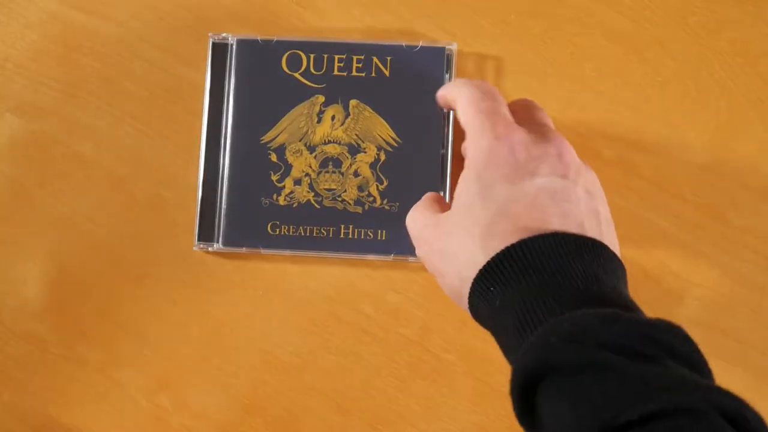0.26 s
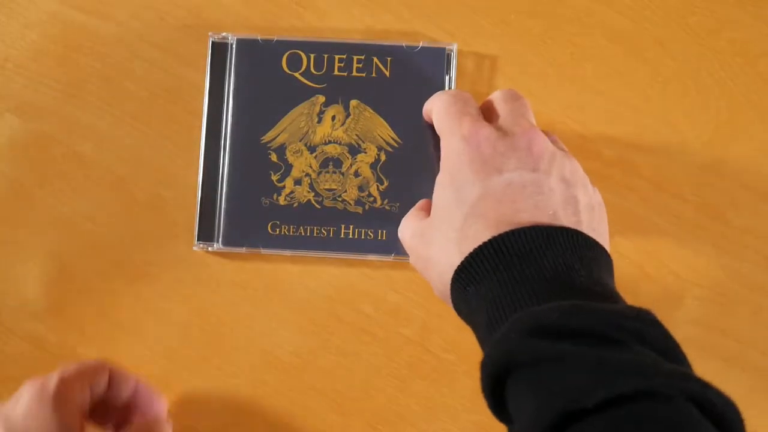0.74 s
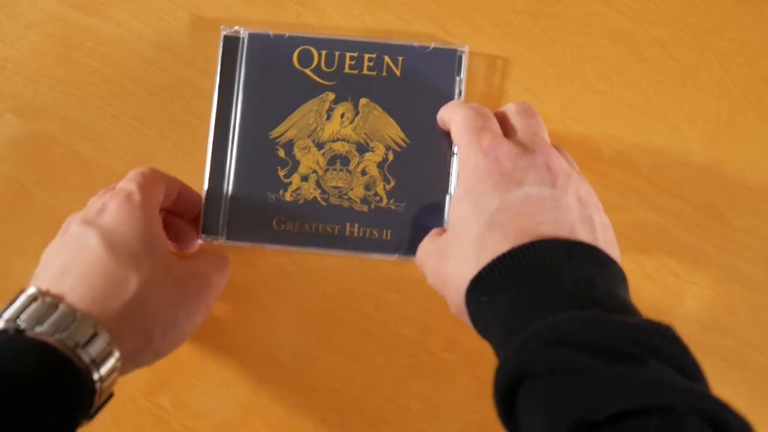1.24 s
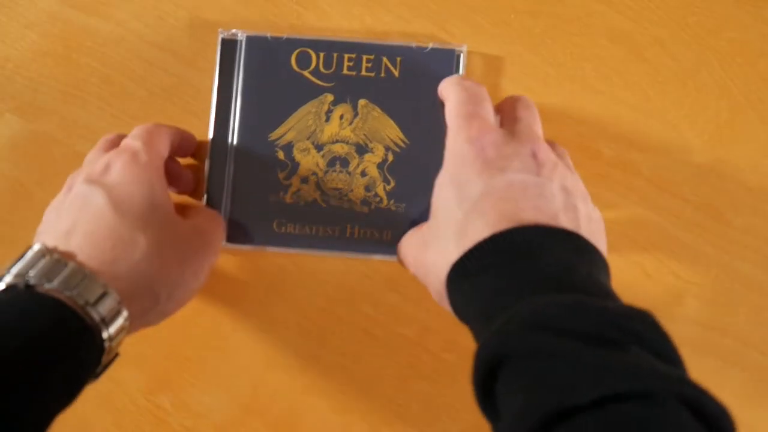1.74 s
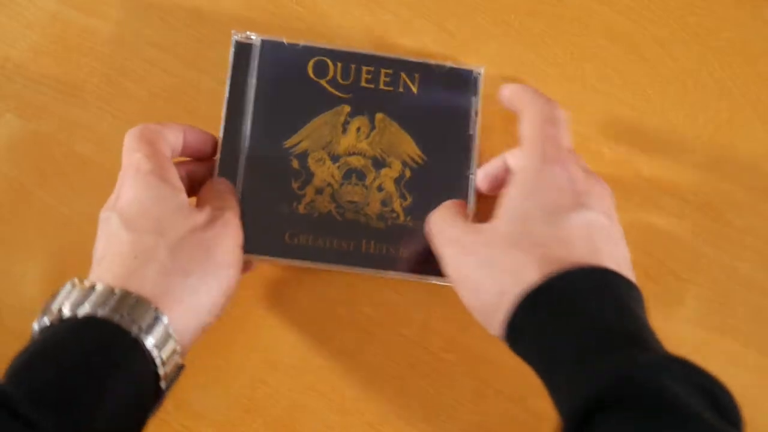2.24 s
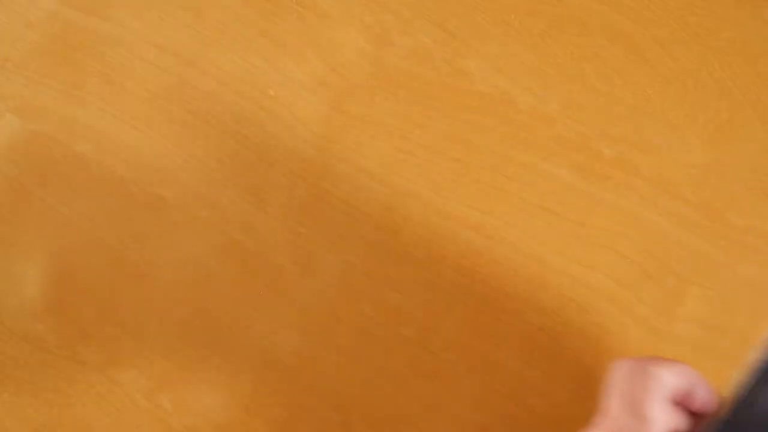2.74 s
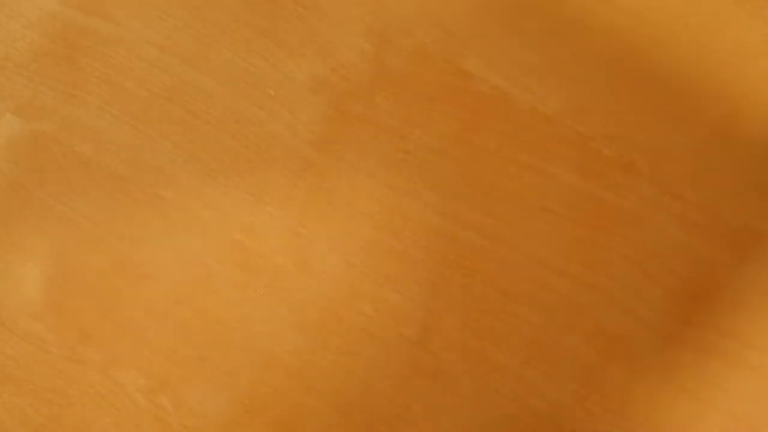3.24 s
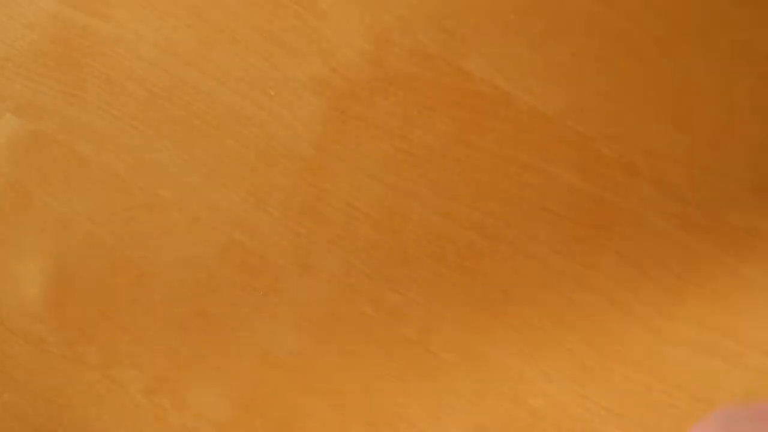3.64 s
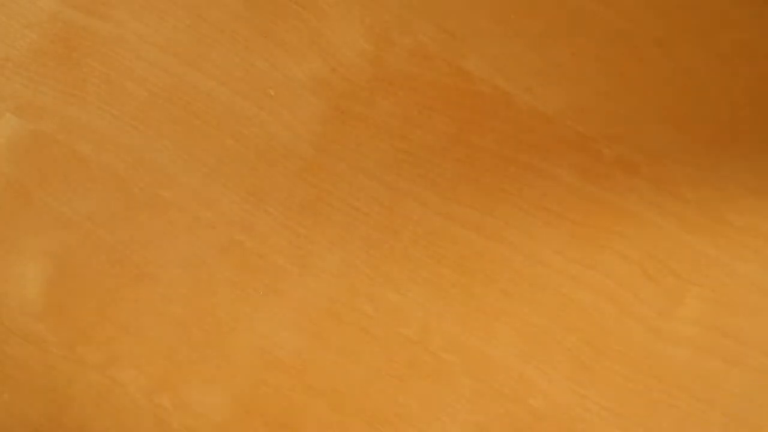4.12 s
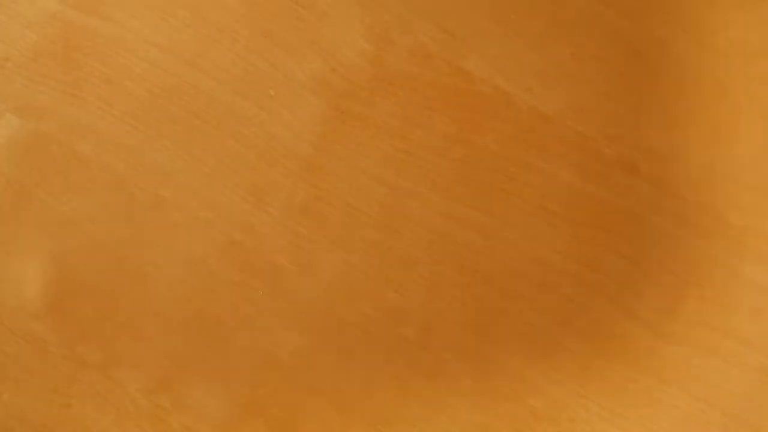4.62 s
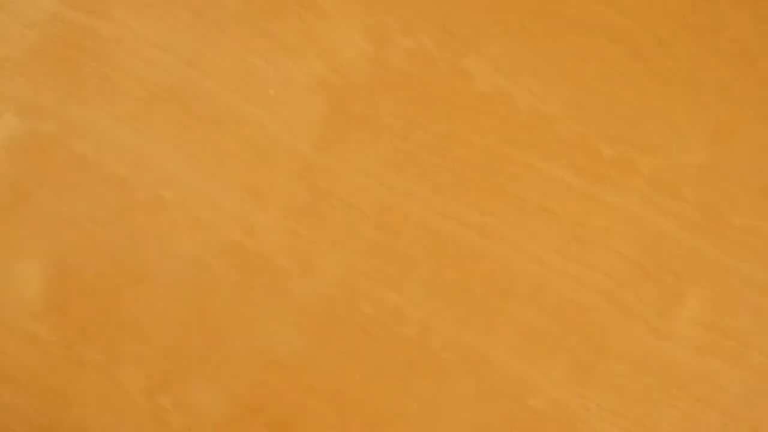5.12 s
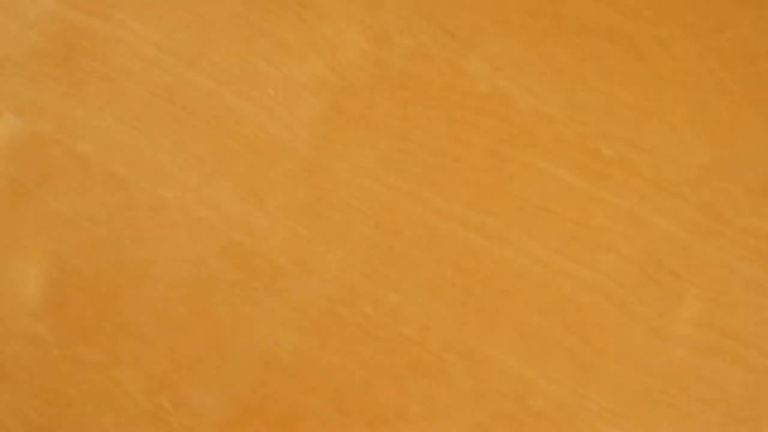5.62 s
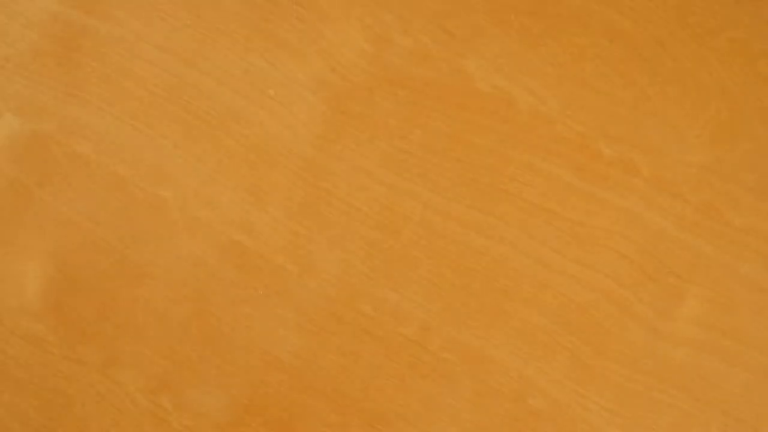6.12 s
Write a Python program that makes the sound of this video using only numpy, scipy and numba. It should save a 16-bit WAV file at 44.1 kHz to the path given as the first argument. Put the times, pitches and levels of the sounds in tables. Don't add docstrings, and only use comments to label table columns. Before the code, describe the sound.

Hard plastic disc cases clack, snap and slide on a wooden table, with short scrapes, dull thuds and quiet gaps in a small room.

```python
import sys
import numpy as np
from scipy import signal
from scipy.fft import rfft, irfft, next_fast_len
from scipy.io import wavfile
from scipy.ndimage import uniform_filter1d
from numba import njit

SR = 44100
rng = np.random.default_rng(int(sys.argv[2]) if len(sys.argv) > 2 else 0)


def ratio(d):
    e = np.asarray(d, float) / 20
    return 10 ** e


def to_wav(sig):
    pcm = np.clip(np.atleast_2d(sig), -1, 1) * 32767
    pcm = np.round(pcm).astype(np.int16)
    wavfile.write(sys.argv[1], SR, pcm.T)


N = 280369


def ring(x, pitch_hz, width_hz):
    return signal.lfilter(*signal.iirpeak(pitch_hz, pitch_hz / width_hz, fs=SR), x)


def body(x, modes):
    return sum((-1) ** k * ratio(level_db) * ring(x, pitch_hz, width_hz)
               for k, (pitch_hz, width_hz, level_db) in enumerate(modes))


def cut(x, hz, kind, order=2):
    return signal.sosfilt(signal.butter(order, hz, kind, fs=SR, output="sos"), x)


def unit(x):
    return x / np.sqrt(np.mean(x ** 2))


def add(out, start_s, x, peak_db):
    i = int(start_s * SR)
    out[i:i + len(x)] += (x * ratio(peak_db) / np.max(np.abs(x)))[:N - i]


def walk(rate_hz):
    k = int(SR / rate_hz)
    held = rng.standard_normal(N)[np.arange(N) // k]
    return 0.76 * uniform_filter1d(uniform_filter1d(held, k), k)


@njit
def glide(x, centre_hz, width_hz):
    y, band, low = np.empty(len(x)), 0., 0.
    for i in range(len(x)):
        g, k = np.tan(np.pi * centre_hz[i] / SR), width_hz / centre_hz[i]
        v = (band + g * (x[i] - low)) / (1 + g * (g + k))
        band, low, y[i] = 2 * v - band, low + 2 * g * v, k * v
    return y


# pitch_hz, density_db_per_hz
AIR_SPECTRUM = [(24, 0.5), (40, -15), (81, -21), (106, 2), (220, -0.5), (363, -9.5), (467, -7),
                (1520, -17.5), (3470, -20), (14500, -32), (16000, -67)]
# time_s, level_db
ARM_MOTION = [(0.0, -61), (0.14, -41), (0.3, -49.5), (0.67, -47.5), (0.81, -51.5), (1.15, -42.5),
              (1.22, -42), (1.65, -42), (2.0, -45.5), (2.19, -38), (2.28, -49.5), (3.8, -51.5),
              (4.04, -51.5), (4.21, -44), (4.53, -48), (5.43, -53), (5.751, -42), (6.36, -46.5)]
# pitch_hz, width_hz, level_db
TABLE_MODES = [(175.3, 19.6, -1.5), (304, 56, -2.5), (382, 118, -6), (708, 210, -7)]


def air():
    pitch_hz, density_db = np.transpose(AIR_SPECTRUM)
    size = next_fast_len(N)
    f_hz = np.maximum(np.arange(size // 2 + 1) * SR / size, 1)
    shape = ratio(np.interp(np.log(f_hz), np.log(pitch_hz), density_db))
    wash = unit(irfft(rfft(rng.standard_normal(N), size) * shape, size)[:N])
    hum = unit(ring(rng.standard_normal(N), 49, 11.7))
    sway = unit(cut(cut(rng.standard_normal(N), 4.16, "high"), 20.3, "low", order=3))
    time_s, arm_db = np.transpose(ARM_MOTION)
    arms = ratio(np.interp(np.arange(N) / SR, time_s, arm_db))
    creak = ratio(-29 + 7.0 * walk(25)) * unit(body(rng.standard_normal(N), TABLE_MODES))
    air_db, hum_db = -63.5, -64
    return ratio(air_db + 0.21 * walk(2.67)) * wash + ratio(hum_db) * hum + arms * (sway + creak)


# start_s, low_t60_s, high_t60_s, level_db
ECHOES = [
    (.002, 0.067, 0.041, -11.5),
    (0.008, 0.312, 0.27, -9.5),
]


def room(x):
    t, reply = np.arange(SR // 2) / SR, 0
    for start_s, low_t60_s, high_t60_s, level_db in ECHOES:
        age_s, dust = np.maximum(t - start_s, 0), rng.standard_normal(len(t))
        dull = cut(dust, 1940.0, "low", order=1)
        bright = dust - dull
        tail = dull * ratio(-60 * age_s / low_t60_s) + bright * ratio(-60 * age_s / high_t60_s)
        tail = tail * np.minimum(age_s / 0.0021, 1)
        reply = reply + ratio(level_db) * tail / np.sqrt(np.sum(tail ** 2))
    return signal.fftconvolve(x, reply)[:N]


# start_s, peak_db, pitch_hz, ring_t60_s
THUD_BLOWS = [(0.065, -36.5, 467, 0.14), (0.484, -45.5, 135, 0.11), (1.184, -26, 179, 0.028),
              (1.204, -35.5, 162, 0.3), (1.413, -48.5, 345, 0.16), (1.61, -48, 183, 0.22),
              (1.718, -47, 191, 0.064), (1.759, -34.5, 174.7, 0.14), (2.13, -43.5, 178, 0.063),
              (2.173, -64, 132, 0.08), (2.753, -28, 455, 0.029), (3.35, -49.5, 816, 0.11),
              (3.755, -47.5, 159, 0.15), (4.066, -38.5, 547, 0.054), (4.151, -39, 575, 0.038),
              (4.168, -36.5, 217, 0.08), (5.675, -50, 227, 0.08), (5.885, -48, 305, 0.077),
              (0.7, -49.5, 198, 0.086), (6.17, -48, 109, 0.11), (0.35, -51.5, 550, .06),
              (5.948, -48.5, 257, 0.074)]
# start_s, peak_db, pitch_hz, ring_t60_s
TABLE_WOBBLES = [(0.084, -36.5, 28.7, 1), (1.187, -42, 102, 0.072), (1.202, -41, 32, 0.76),
                 (1.67, -38.5, 23.2, 0.24), (1.762, -49.5, 626, 0.14), (2.17, -61, 30, 0.19),
                 (4.07, -48.5, 816, 0.042), (4.169, -39.5, 36.7, 0.91), (5.74, -39, 30.8, 0.46),
                 (5.861, -36.5, 21, 0.52)]


def knocks():
    out, t = np.zeros(N), np.arange(SR) / SR
    for start_s, peak_db, pitch_hz, t60_s in THUD_BLOWS:
        push = rng.standard_normal(SR // 4) * np.exp(-t[:SR // 4] / 0.0027)
        boards = cut(body(push, TABLE_MODES), 0.53 * pitch_hz, "high")
        thud = ring(push, pitch_hz, 1.54 / t60_s) + 0.56 * boards
        add(out, start_s + 0.00213, cut(thud, 780.0, "low"), peak_db)
    for start_s, peak_db, pitch_hz, t60_s in TABLE_WOBBLES:
        swing = np.sin(2 * np.pi * pitch_hz * t) * (1 - np.exp(-t / 0.015))
        add(out, start_s, swing * ratio(-60 * t / t60_s), peak_db)
    return out


def edges(x, lifted):
    return cut(cut(x + lifted, 1600.0, "high"), 9040.0, "low", order=4)


def pressure(rows):
    t, plain, accent = np.arange(N) / SR, np.zeros(N), np.zeros(N)
    swell_db, roundness = 25, 1.5
    for start_s, hardest_s, end_s, level_db, over_db in rows:
        on = slice(max(int(start_s * SR), 0), min(int(end_s * SR), N))
        slack = np.interp(t[on], [start_s, hardest_s, end_s], [1, 0, 1])
        gain = ratio(level_db - swell_db * slack ** roundness)
        plain[on] += gain
        accent[on] += gain * ratio(over_db)
    return uniform_filter1d(plain, size=256), uniform_filter1d(accent, size=256)


# pitch_hz, width_hz, level_db
LID_MODES = [(1250, 243, -1.5), (1483, 148, 3.5), (1660, 310, 0), (2000, 180, -7)]
# pitch_hz, width_hz, level_db
EDGE_MODES = [(2055, 554, -1), (2880, 860, -3), (3400, 410, 0), (3806, 526, -3.5), (4800, 930, -7.5),
              (5420, 370, -4.5), (6040, 800, -10.5)]
# start_s, hardest_s, end_s, lid_db, edge_over_lid_db
SKIN_RUBS = [(1.015, 1.07, 1.146, -65, 10), (1.165, 1.186, 1.2, -43, -2), (1.6, 1.615, 1.74, -61, 0.5),
             (1.86, 1.88, 1.834, -62, 4), (2.075, 2.115, 2.14, -50, 0.5), (2.3, 2.345, 2.35, -60.5, 5),
             (2.37, 2.388, 2.42, -62, -8), (2.4, 2.47, 2.87, -75, 4.5), (2.87, 2.908, 3.01, -61.5, -4),
             (2.9, 3.03, 3.18, -71, 5), (3.1, 3.16, 3.45, -70.5, 1), (3.335, 3.36, 3.407, -54, -2.5),
             (3.55, 3.78, 4.12, -73.5, 2.5), (5.1, 5.33, 5.5, -67, 2), (5.6, 5.65, 5.58, -69, 5.5),
             (6.24, 6.3, 6.6, -75.5, 4.5)]
# start_s, hardest_s, end_s, lid_db, table_over_lid_db
CASE_DRAGS = [(-.1, 0.0, 0.043, -55, 3), (0.025, 0.05, 0.076, -41.5, -8), (0.06, 0.09, 0.23, -75.5, 17.5),
              (1.19, 1.21, 1.31, -59.5, 7.5), (1.38, 1.42, 1.49, -72, 9.5), (2.0, 2.04, 2.11, -73.5, 15.5),
              (2.13, 2.142, 2.38, -61.5, 1), (4.16, 4.18, 4.24, -56.5, -8), (4.23, 4.26, 4.3, -61.5, 4.5),
              (5.15, 5.33, 5.48, -77.5, 8), (5.66, 5.69, 5.75, -78, 16), (5.81, 5.888, 5.9, -53.5, -3.5),
              (5.9, 5.96, 6, -65, 10)]
# start_s, hardest_s, end_s, edge_db, hiss_over_edge_db
FINGER_BRUSHES = [(0.0, 0.054, 0.097, -51, -7), (1.03, 1.075, 1.1, -68, -2), (2.07, 2.1, 2.13, -50.5, -15),
                  (2.305, 2.335, 2.39, -62, -4), (2.87, 2.91, 2.92, -63, 3), (5.12, 5.2, 5.4, -72, 0),
                  (5.82, 5.86, 5.94, -70, -15)]
# time_s, lid_db
LAST_SCRAPE = [(5.955, -70), (5.975, -61), (6.005, -62), (6.045, -53), (6.075, -52.5), (6.125, -49.5),
               (6.175, -51), (6.204, -61), (6.27, -80)]


def slides():
    patches_db = 3.24 * np.array([walk(45), walk(60), walk(65), walk(29.96)])
    slip_db = 2.0 * rng.exponential(size=N) + 2.0 * walk(90) + patches_db
    slips = rng.standard_normal((4, N)) * ratio(slip_db)
    lid = unit(cut(cut(body(slips[0], LID_MODES), 380.0, "high"), 2160.0, "low"))
    stiff = cut(body(slips[1], EDGE_MODES), 9000.0, "low", order=1)
    touched_hz = 3430 * (1 + 0.029 * walk(2.62))
    edge = unit(edges(stiff, 0.7 * glide(stiff, touched_hz, 810.0)))
    hiss = unit(cut(cut(slips[2], 4900.0, "high", order=3), 7800.0, "low", order=1))
    wood = unit(body(slips[3], TABLE_MODES))

    rub, rub_edge = pressure(SKIN_RUBS)
    drag, drag_table = pressure(CASE_DRAGS)
    brush, brush_hiss = pressure(FINGER_BRUSHES)
    time_s, scrape_db = np.transpose(LAST_SCRAPE)
    scrape = ratio(np.interp(np.arange(N) / SR, time_s, scrape_db, left=-120, right=-120))

    on_lid = rub + drag + scrape
    on_edge = rub_edge + ratio(-6) * drag + brush + ratio(1) * scrape
    in_hiss = ratio(-16) * rub_edge + ratio(-29) * drag + brush_hiss + ratio(-15) * scrape
    on_wood = ratio(-7) * rub + drag_table + ratio(-18.5) * scrape
    return on_lid * lid + on_edge * edge + in_hiss * hiss + on_wood * wood


# start_s, lid_peak_db, lid_hz, edge_over_lid_db, edge_hz
BLUNT_CLACKS = [(0.038, -34.5, 1330, -6, 5580), (0.053, -33.5, 1360, 0, 5470),
                (0.0652, -24, 1310, -4, 3620), (0.0692, -33.5, 1530, 10, 4350), (0.407, -40, 1515, 2, 3580),
                (1.1907, -29.5, 1350, 2, 2000), (1.6114, -37.5, 1740, 6.5, 3600),
                (1.7604, -36.5, 1390, -2, 4800), (1.762, -36, 1460, 0, 3400), (2.132, -30, 1250, 2.5, 3340),
                (2.5819, -33.5, 1340, -4.5, 3550), (2.7546, -26, 1380, 5, 3100),
                (2.7732, -32.5, 1380, -8, 2070), (4.0728, -36, 1470, 4, 3240), (4.1514, -35, 990, 11, 2730),
                (4.154, -30, 1090, 9.5, 2070), (4.155, -49, 1080, -4, 2600), (4.168, -38, 1090, 5, 2750),
                (2.3838, -46, 1250, 5, 5000), (2.3873, -44.5, 1250, 4, 2930)]
# start_s, lid_peak_db, lid_hz, edge_over_lid_db, edge_hz
BRITTLE_SNAPS = [(0.4873, -33.5, 1300, 1.5, 6050), (1.0163, -59, 1850, 14, 3670),
                 (1.1135, -40, 1250, -2.5, 3080), (1.1875, -19, 1407, 4.5, 5600),
                 (1.1977, -54, 1220, -2, 2500), (1.2046, -43, 1290, 16, 2930),
                 (2.114, -38.5, 1950, 10, 4450), (2.5781, -40.5, 1560, -0.5, 2910),
                 (2.7576, -22.5, 1423, 2.5, 3250), (2.8957, -41, 1480, 1, 5040),
                 (2.909, -40, 1700, 2.5, 3120), (2.9151, -45.5, 1750, 0, 4800),
                 (3.3495, -42.5, 1480, -3, 3640), (3.3631, -42, 1310, 5, 5440),
                 (3.8371, -70, 1660, 11, 5710), (4.0704, -27, 1450, 5, 2250),
                 (4.0824, -36.5, 1470, 6, 2630), (4.0873, -37.5, 1440, 5, 2480),
                 (4.1651, -44, 1160, 9, 3170)]
# start_s, lid_peak_db, lid_hz, edge_over_lid_db
LIGHT_TAPS = [(0.985, -51.5, 1530, -20), (1.1747, -39, 1290, -10), (1.4147, -50.5, 1270, -4),
              (1.435, -48.5, 1330, -4), (1.473, -53, 1330, -7), (1.617, -37.5, 1400, -11),
              (1.6255, -45.5, 980, 1), (1.669, -53, 1560, -7), (1.7236, -45.5, 1190, -4.5),
              (2.174, -41.5, 1260, -1), (2.223, -38.5, 1250, 0), (2.2269, -36.5, 1340, 1.5),
              (2.236, -37.5, 1270, 2.5), (2.2442, -38, 1280, -6), (2.3226, -49, 1190, -6),
              (2.3488, -42.5, 1300, 3), (2.7616, -27, 1180, -22), (3.7836, -53.5, 1360, -12),
              (4.249, -49.5, 1800, -1), (4.2603, -48.5, 1210, 4), (5.54, -53, 1490, -6),
              (5.675, -49.5, 1100, -3), (5.718, -49.5, 1510, -5), (5.8958, -54, 1510, 7),
              (5.948, -47, 1410, 7), (5.9534, -48, 1240, -6), (5.986, -52, 1810, -2),
              (6.1239, -46, 1640, 2)]
# start_s, peak_db
HARD_TICKS = [
    (.4873, -46),
    (3.8366, -40),
    (4.0704, -31),
]


def clicks():
    near, around, t = np.zeros(N), np.zeros(N), np.arange(2048) / SR
    # crack_over_lid_db, before the share that follows the edges
    contacts = [(*row, -17.5) for row in BLUNT_CLACKS] + [(*row, -7) for row in BRITTLE_SNAPS]
    contacts += [(*row, 3260 * (1 + 0.15 * rng.standard_normal()), -24) for row in LIGHT_TAPS]
    rattle_ms, grit_db = 1.64, -13
    for start_s, lid_db, lid_hz, edge_db, edge_hz, crack_db in contacts:
        grit, size = rng.standard_normal(len(t)), rng.exponential(size=len(t))
        rattle = ratio(grit_db + 4.52 * size) * grit * np.exp(-(1000 * t / rattle_ms) ** 2)
        rattle = rattle + 2.7 * (t == 0)
        lid = ring(ring(rattle, lid_hz, 177.0), lid_hz, 760.0) + 0.35 * body(rattle, LID_MODES)
        stiff = body(rattle, EDGE_MODES)
        crack = cut(cut(rattle * np.exp(-t / 0.014), 6380.0, "high", order=4), 7900.0, "low")
        add(near, start_s, cut(lid, 2020.0, "low"), lid_db)
        add(near, start_s, edges(stiff, 1.74 * ring(stiff, edge_hz, 600.0)), lid_db + edge_db)

        room_edge = body(rattle * np.exp(-t / 0.00027), EDGE_MODES)
        add(around, start_s, ring(rattle * np.exp(-t / 0.0011), lid_hz, 330.0), lid_db)
        add(around, start_s, edges(room_edge, 0), lid_db + edge_db)
        for out in near, around:
            add(out, start_s, crack, lid_db + 0.5 * edge_db + crack_db)
    for start_s, peak_db in HARD_TICKS:
        for out in near, around:
            tick = rng.standard_normal(len(t)) * np.exp(-t / 0.00049)
            add(out, start_s, cut(tick, 9900.0, "high", order=3), peak_db)
    return near, around


def scene():
    (near, around), rub, low = clicks(), slides(), knocks()
    heard = around + rub + 0.5 * cut(low, 100.0, "high")
    mid = near + rub + low + air() + room(heard)
    side = 0.18 * room(heard) + 0.026 * cut(air(), 57.0, "high", order=1)
    return np.array([mid + side, mid - side])


def band_limit(x):
    return signal.sosfilt(signal.butter(12, 16630, fs=SR, output="sos"), x)


def record(dry):
    hiss_db, top_hz = -70, 15700
    noise = rng.standard_normal(dry.shape) + 0.35 * rng.standard_normal(N)
    hiss = ratio(hiss_db) * cut(noise, 120.0, "high")
    top_cut = signal.ellip(6, 0.2, 22, top_hz, fs=SR, output="sos")
    return band_limit(signal.sosfilt(top_cut, dry + hiss))


dry = scene()
out = record(dry)
to_wav(out)
```